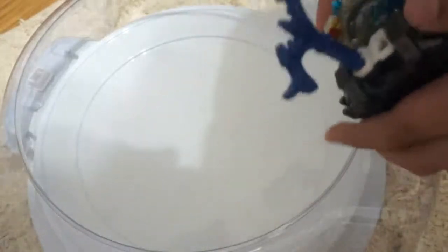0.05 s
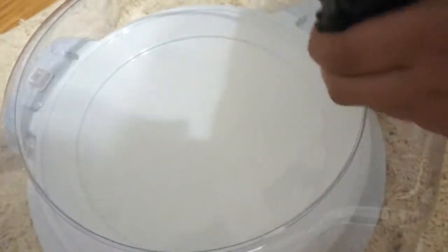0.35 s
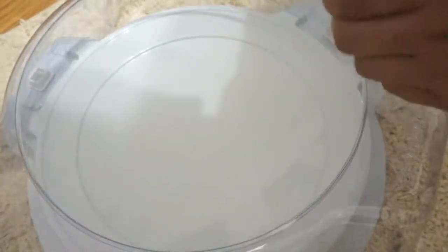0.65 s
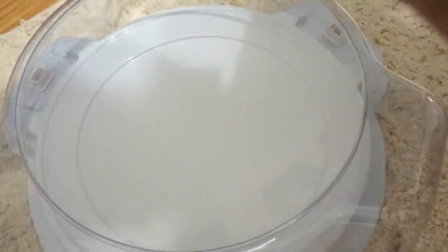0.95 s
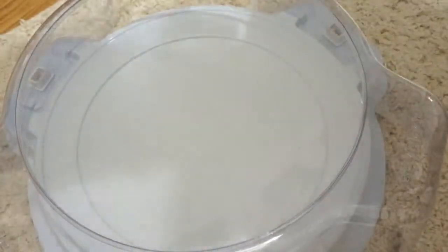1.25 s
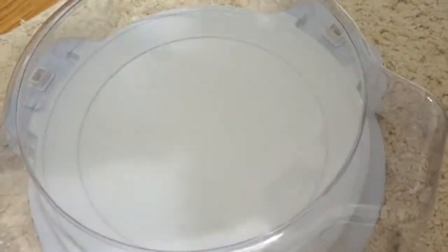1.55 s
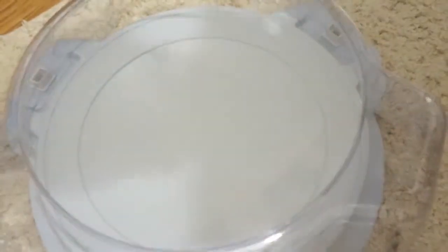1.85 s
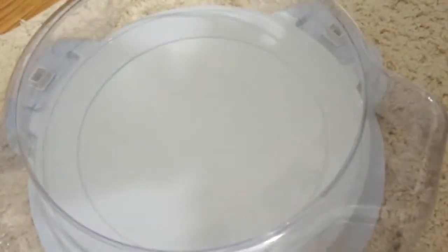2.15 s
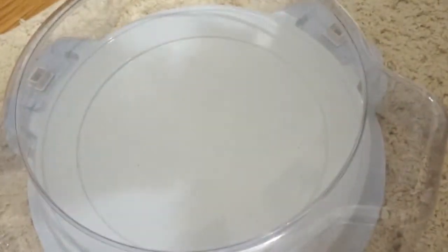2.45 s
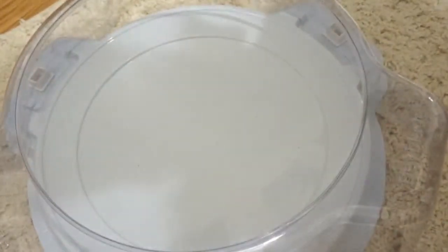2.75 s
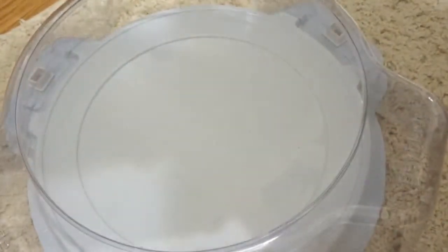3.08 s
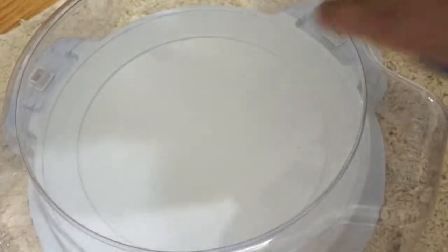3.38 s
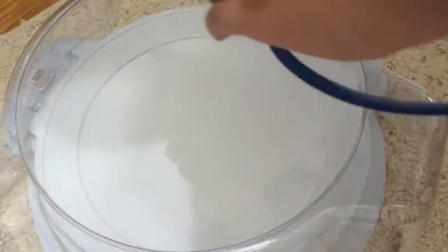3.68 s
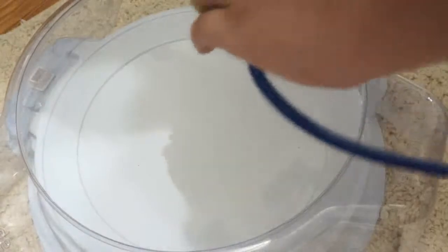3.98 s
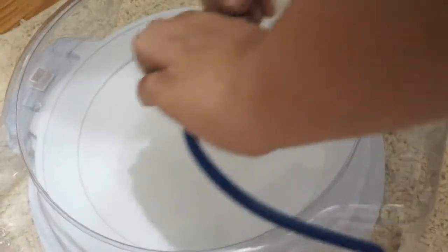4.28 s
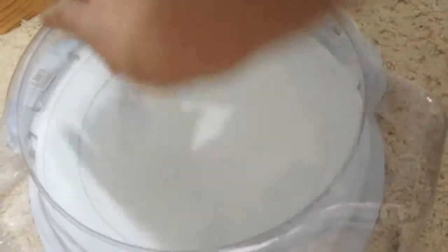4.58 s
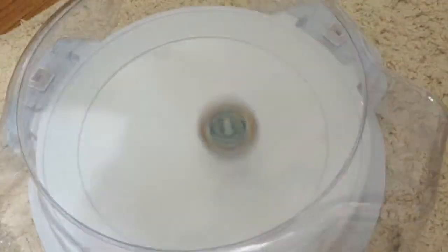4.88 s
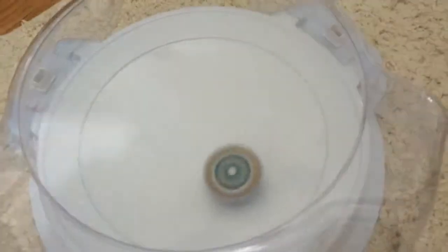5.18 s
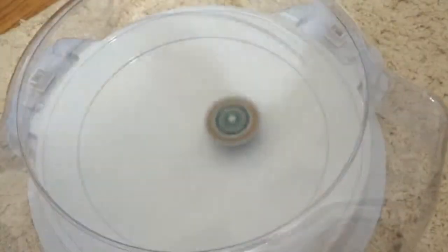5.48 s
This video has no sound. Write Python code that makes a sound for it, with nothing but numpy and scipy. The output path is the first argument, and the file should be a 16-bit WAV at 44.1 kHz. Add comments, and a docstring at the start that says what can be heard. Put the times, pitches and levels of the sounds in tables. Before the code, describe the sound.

Close up, slightly to the right, small plastic parts click and scrape as a toy top is fitted to its launcher. A light knock on a plastic dish comes at about 1 second, then more rubbing and little catches. At 2.5 seconds the top snaps home with a hollow rattle. Near 2.8 seconds a toothed cord clicks and zips in, followed by a soft swish and another dish knock at 4.2. At 4.6 seconds, straight ahead, the cord is ripped out with a loud, very short rising rasp, ending in sharp clicks and whirring gears. The top lands at 4.8 seconds, squeals briefly and bounces repeatedly, clacking and rumbling in the ringing dish. From about 5.4 seconds it spins with a quieter, steady scratching until the end, near 5.7. The small, hard room adds a slight echo and faint hiss.

```python
"""Launching a toy spinning top

A top clicks onto its hand launcher over a plastic dish, and a toothed cord zips in.
The cord is ripped out with a rising rasp, and the launcher's gears run on.
The top drops, bounces in the ringing dish, skids and spins on its scraping tip.
A small, hard room echoes a little; the microphone is close."""
import sys
import numpy as np
from scipy import signal
from scipy.fft import rfft, irfft, next_fast_len
from scipy.io import wavfile
from scipy.ndimage import uniform_filter1d, minimum_filter1d, map_coordinates

SR = 44100
rng = np.random.default_rng(int(sys.argv[2]) if len(sys.argv) > 2 else 0)


def dump_mix(stems):
    """Bounce the given channels to the path in sys.argv[1] as a 16-bit WAV at rate SR."""
    frames = np.atleast_2d(stems).T  # one column per channel
    limited = np.clip(frames, -1, 1)  # hard clip at full scale
    pcm = np.round(limited * 32767).astype(np.int16)
    wavfile.write(sys.argv[1], SR, pcm)


N = 252648
TIME = np.arange(N) / SR


def amp(db):
    """Turn decibels into a number to multiply by."""
    return 10 ** (np.asarray(db) / 20)


def unit(x):
    """Scale x to an average (rms) level of 1."""
    return x / np.sqrt(np.mean(x ** 2) + 1e-20)


def burst(x, span):
    """Give x the energy of a level-1 sound lasting span seconds."""
    return x / np.sqrt(np.sum(x ** 2) / (span * SR) + 1e-20)


def along(points, hz):
    """Read between the rows of a frequency table, on a log scale."""
    f, values = np.transpose(points)
    return np.interp(np.log(hz + 1), np.log(f + 1), values)


def curve(points):
    """Join (time, value) points with straight lines."""
    return np.interp(TIME, *np.transpose(points))


def wobble(rate):
    """A smooth random curve through rate points a second."""
    return map_coordinates(rng.standard_normal(int(N * rate / SR) + 4), [TIME * rate])


def swell(s, rise, fall, hold=0.):
    """Grow to 1 at time s, hold, then fade; rise and fall are the seconds for the top 10 dB."""
    away = np.maximum((s - TIME) / rise, 0) + np.maximum((TIME - s - hold) / fall, 0)
    return amp(-10 * away ** 1.1)


def filtered(x, gain_db):
    """Filter x by gain_db(hz), so that any ringing comes after its cause."""
    size = 2 * next_fast_len(len(x) // 2 + 4096)
    gain = amp(np.maximum(gain_db(np.fft.rfftfreq(size, 1 / SR)), -110))
    cepstrum = irfft(np.log(gain))
    cepstrum[1:size // 2] *= 2
    cepstrum[size // 2 + 1:] = 0
    return irfft(rfft(x, size) * np.exp(rfft(cepstrum)))[:len(x)]


def shaped(x, tone):
    """Give x the lows and highs of a tone table, at level 1."""
    return unit(filtered(x, lambda hz: along(tone, hz)))


def resonate(x, centre, width):
    """Let x ring around one frequency."""
    return filtered(x, lambda hz: -20 * np.log10(1 + ((hz - centre) / width) ** 2))


def add(track, s, sound):
    """Mix a sound into a track from time s."""
    part = track[max(round(s * SR), 0):][:len(sound)]
    part += sound[:len(part)]


# Tone of the background hiss: f/Hz, level/dB
HISS_TONE = [(18, -54), (30, -22), (152, -6), (271, -3), (931, 2.5), (1180, -4), (1380, 0.5), (1530, 0.5),
             (1750, -7), (3830, -5), (5990, -6), (7010, -6), (10400, -4), (15800, -7.5)]
# How loud the hiss is: t/s, level/dB
HISS_LEVEL = [(0, -67), (0.7, -67.5), (1.1, -63), (5.73, -60)]
# How loud the hum is: t/s, level/dB
HUM_LEVEL = [(0, -102), (0.7, -92), (1.3, -84.5), (2.3, -89), (3.0, -97), (3.8, -82)]
def background():
    """The room hisses softly over a faint, low hum."""
    mid, side = (shaped(rng.standard_normal(N), HISS_TONE) for ear in range(2))
    hiss = np.array([mid + 0.12 * side, mid - 0.22 * side])
    hum = unit(resonate(rng.standard_normal(N), centre=150, width=18))
    return amp(curve(HISS_LEVEL)) * hiss + amp(curve(HUM_LEVEL)) * hum


def grainy(tone, grain_db):
    """Noise whose level flickers in tiny grains."""
    slips = rng.standard_normal(N) * amp(grain_db * wobble(700) + wobble(50))
    return shaped(slips, tone)


# Finger strokes: peak t/s, level/dB, rise/s, fall/s, ring f/Hz, ring above scrape/dB
STROKES = [(0.04, -42.5, 0.13, 0.028, 3950, -10.5), (0.54, -51.5, 0.036, 0.05, 3100, -2),
           (0.835, -53.5, 0.084, 0.14, 2600, -5.5), (1.4, -56, 0.1504, .14, 3300, 3),
           (1.631, -47.5, 0.018, 0.031, 3420, -8), (1.8, -63, 0.13, 0.19, 3350, -2),
           (2.13, -52.5, 0.025, 0.032, 3150, -6), (2.29, -46.5, 0.063, .05, 3280, -13),
           (2.42, -53, 0.054, 0.0248, 3200, -8), (3.09, -55.5, 0.21, 0.076, 2600, -10),
           (4.28, -58.5, 0.088, 0.035, 2380, 0), (4.53, -54, 0.06, .07, 2870, -18)]
# Tone of parts rubbing: f/Hz, level/dB
RUB_TONE = [(400, -40), (750, -24.5), (1400, -14), (2200, -12.5), (2750, -3.5), (3200, -3), (3700, -12),
            (4400, -9), (5900, -11.5), (7800, -18), (14000, -27.5)]
def rubbing(ring_width_hz=380, wander=.045):
    """Fingers slide the parts over each other; each stroke scrapes and makes a part ring."""
    levels = np.array([amp(db) * swell(s, rise, fall) for s, db, rise, fall, _, _ in STROKES])
    ring_hz, ring_db = np.transpose(STROKES)[4:]
    # the pitch shifts with the grip, and every slip knocks the ring out of step
    pitch = ring_hz[levels.argmax(axis=0)] * (1 + wander * wobble(18)) + ring_width_hz * wobble(1800)
    flicker = amp(3.5 * wobble(350) + 1.9 * wobble(40))
    ring = unit(np.sin(2 * np.pi * np.cumsum(pitch) / SR) * flicker)
    return levels.sum(axis=0) * grainy(RUB_TONE, grain_db=3) + amp(ring_db) @ levels * ring


# Small parts give off little bass: f/Hz, level/dB
SMALL_PART_TONE = [(100, -26), (450, -15), (1000, 0)]
def contacts(rows, life, rise=0.00014):
    """Hard parts chatter and ring briefly. Returns the direct sound and the sound sent into the room."""
    ahead, around, t = np.zeros(N), np.zeros(N), np.arange(SR // 40) / SR
    for s, db, ring_hz, ring_db, low_db, treble_db in rows:
        chatter = rng.standard_normal(len(t)) * (1 - np.exp(-t / rise)) * np.exp(-t / life)
        body = [(450, low_db - 13), (750, low_db - 9), (1150, low_db - 3.5), (1550, low_db), (2100, -3),
                (3300, 0.5), (8000, treble_db), (12000, treble_db - 6.5), (16000, treble_db - 15)]
        tone = lambda hz: along(body, hz) + along(SMALL_PART_TONE, hz)
        ring = lambda hz: ring_db / (1 + ((hz - ring_hz) / (0.11 * ring_hz)) ** 2)
        click = filtered(chatter, lambda hz: tone(hz) + ring(hz))
        add(ahead, s, amp(db) * burst(click, 0.0019))
        # summed over all directions, the chatter sounds like one clean tick
        tick = filtered(1. * (t == 0), lambda hz: tone(hz) + 0.71 * ring(hz))
        add(around, s, amp(db) * burst(tick, 0.0015))
    return np.array([ahead, around])


# Parts meeting: t/s, level/dB, ring f/Hz, ring boost/dB, lows/dB, treble/dB
CLICKS = [(0.0179, -28, 3970, 17, -17, 5), (0.0217, -26, 2600, 11.5, 1.5, 2),
          (0.0441, -25.5, 7300, 13, 1, 8), (0.0567, -23.5, 3880, 15.5, 0.5, 2.5),
          (0.0615, -27.5, 2630, 8, -13, -1), (0.0668, -35, 7860, 9, -5, 0),
          (0.0719, -31.5, 4010, 12, -16, 1), (0.218, -30.5, 3200, 11.5, 0, -4.5),
          (0.258, -24.5, 6360, 8, -7, 0), (0.3135, -25.5, 2860, 7, -5, -8),
          (0.3179, -28.5, 2900, 13, 0, -5), (0.322, -22.5, 5700, 7.5, -10, 15),
          (0.3257, -18.5, 5720, 14.5, -7, 2), (0.5615, -30, 4700, 8.5, -6, -1.5),
          (2.1331, -36, 3120, 20, 8, 2.5), (2.3963, -27, 3224, 3, -8, -10.5), (2.4422, -35, 3000, 6, 4, -5),
          (2.4754, -15.5, 4080, 6, -2.5, -9.5), (2.4858, -23.5, 1560, 13, -5, -3),
          (2.4967, -28, 3640, 12, 1, -9), (2.6344, -30, 4580, 9.5, -14, -5),
          (2.8292, -19.5, 12750, 17, 1.5, 3.5), (2.894, -20.5, 1780, 9.5, -7, -3.5),
          (3.1529, -39.5, 4670, 8, -5, -4), (4.5387, -33.5, 2820, 8, 1.5, -2),
          (4.566, -23.5, 2510, 17, -6, -7), (4.5994, -17, 1770, 0, -3.5, -19)]
def clicks():
    """Hard parts of the top and launcher snap together."""
    return contacts(CLICKS, life=0.0031)


# Notes the dish rings at: f/Hz, level/dB, time to fade by 60 dB/s
DISH_NOTES = [(117, -23, .2), (198, -10, 0.17), (227.4, -2.5, 0.18), (259, -3.5, 0.2), (290, -5.5, 0.25),
              (368.3, -4, 0.3), (422, -10.5, 0.62), (459, 4.5, 0.26), (525.5, 4, 0.19), (630, -8, 0.31),
              (814, -5, 0.18), (945, -13, .2), (1182, -3, 0.083), (1293, -4, 0.17)]
# Tone of its dull thud: f/Hz, level/dB
THUD_TONE = [(35, -48), (60, -44), (100, -13.5), (219, -5.5), (264, -3), (310, -10), (355, -1), (446, -2.5),
             (584, -1), (634, -3.5), (1020, -21), (1160, -10), (1500, -24), (1950, -23), (3300, -120)]
# Deep bass is cut from the knocks: f/Hz, level/dB
DISH_BASS_CUT = [(30, -40), (75, -14), (150, -1)]
def dish_knocks(rows, clack_tone, notes_db, push_db, clack_fade_s, crack_db):
    """A blow dents the thin dish, then rings its low notes and a clacking crowd of higher ones."""
    out, t = np.zeros(N), np.arange(SR // 2) / SR
    dent = t / 0.0017
    push = np.sin(2 * np.pi * 350 * t) * dent * np.exp(1 - dent)
    clack_shape = amp(-60 * t / clack_fade_s) + amp(crack_db) * np.exp(-t / 0.0021)
    for s, db, clack_db, *_ in rows:
        notes = sum(amp(level + rng.normal(0, 2.3) - 60 * t / fade)
                    * np.sin(2 * np.pi * (hz * t + rng.random())) for hz, level, fade in DISH_NOTES)
        ring = burst(notes * (1 - np.exp(-dent)), 0.0082)
        thud = burst(shaped(rng.standard_normal(len(t)) * amp(-60 * t / 0.11), THUD_TONE), 0.015)
        clack = burst(shaped(rng.standard_normal(len(t)) * clack_shape, clack_tone), 0.008)
        low = amp(notes_db) * ring + amp(-12) * thud + amp(push_db) * push
        add(out, s, amp(db) * (low + amp(clack_db - 11.5) * clack))
    return filtered(out, lambda hz: along(DISH_BASS_CUT, hz))


# Bumps on the dish: t/s, level/dB, clack boost/dB
BUMPS = [(0.9694, -37, 15), (4.1646, -32, 9.5), (4.3304, -46, 15)]
# Tone of their clack: f/Hz, level/dB
BUMP_TONE = [(71, -51), (120, -25.5), (275, -4), (642, -1.5), (818, -0.5), (1000, -9), (1300, -7.5),
             (1700, -7.5), (3040, -10), (4500, -21), (6500, -27), (15000, -40)]
def bumps():
    """A hand knocks the dish from outside."""
    return dish_knocks(BUMPS, BUMP_TONE, notes_db=-13.5, push_db=-11, clack_fade_s=.18, crack_db=13)


# Snags of a sliding part: t/s, level/dB, ring f/Hz, treble/dB
SNAGS = [(1.2065, -37.5, 3040, -10), (1.3485, -25, 3170, -15), (1.3945, -48, 3180, -11),
         (1.407, -40, 3450, -14), (1.476, -34, 3200, -11), (1.5029, -36.5, 3250, -6),
         (1.629, -27.5, 3450, -1.5), (1.7356, -43, 3140, -22), (1.816, -46.5, 3500, -18),
         (1.886, -42.5, 3320, -1), (1.896, -44.5, 3100, -4), (1.9202, -42, 2320, -9),
         (2.1421, -31.5, 2720, -27), (2.2019, -43, 3120, -17), (3.12, -41.5, 4720, -7),
         (3.2381, -38.5, 2720, -7), (3.6732, -45, 4440, -6), (3.87, -49, 3900, -12),
         (4.4555, -47, 2300, -16)]
def snags(low_db=-5):
    """A part catches and lets go; the harder the catch, the more a plastic prong rings."""
    rows = [(s, db, hz, 13.5 + 0.81 * (db + 38.5), low_db, treble_db) for s, db, hz, treble_db in SNAGS]
    return contacts(rows, life=0.0016)


# Tone of the launcher's hollow body: f/Hz, level/dB
HOUSING_TONE = [(300, -50), (700, -28), (1000, -13), (1200, -1.5), (1580, 0), (2000, -15), (3150, -5),
                (4600, -10), (8700, -15.5), (14000, -33)]
def latch(s=2.477, db=-28.5, fade_s=0.36):
    """The top snaps home and the launcher's hollow body rattles."""
    out, t = np.zeros(N), np.arange(SR // 2) / SR
    rattle = rng.standard_normal(len(t)) * amp(-60 * t / fade_s + 3.6 * wobble(411)[:len(t)])
    add(out, s, amp(db) * burst(shaped(rattle, HOUSING_TONE), 0.018))
    return out


def ratchet(rate, jitter, snap):
    """One snap per tooth; snap is its fade time as a share of the gap between teeth."""
    teeth = np.cumsum(rate * (1 + jitter * wobble(900))) / SR
    return np.exp(-(teeth % 1) / snap)


def coast(tone, start, db, rise, hold, fall, teeth_hz, slowing_s):
    """Gears run free while a small lever skips over their teeth ever more slowly."""
    age = TIME - start
    rate = teeth_hz * np.exp(-np.clip(age / slowing_s, 0, 2))
    skips = .2 + ratchet(rate, jitter=.15, snap=0.15)
    level = (age > 0) * swell(start + rise, rise, fall, hold) * amp(db + 1.9 * wobble(140))
    return level * shaped(skips * rng.standard_normal(N), tone)


# Tone of the cord zipping in: f/Hz, level/dB
FEED_TONE = [(240, -69), (400, -37), (425, -39), (504, -24), (615, -29), (799, -13), (890, -23), (1290, -7),
             (1370, -3), (1750, 0.5), (3450, -2.5), (3720, -4.5), (5640, -6), (12500, -3.5), (15800, -9)]
def cord_feed():
    """Feeding in the cord turns the gears with a short zip."""
    return coast(FEED_TONE, 2.829, db=-37, rise=.012, hold=.1, fall=0.051, teeth_hz=622, slowing_s=.19)


# Tone of the swish: f/Hz, level/dB
SWISH_TONE = [(180, -50), (300, -33), (339, -15), (592, -17.5), (690, -11.5), (1020, -15), (1260, -6),
              (1450, -10), (2900, 1), (3490, -11), (5460, -7.5), (5900, -13.5), (8030, -18), (9370, -36),
              (12000, -29), (15600, -56), (22000, -120)]
def swish():
    """One long, soft rub as the launcher is swung over the dish."""
    return amp(-50) * swell(3.406, rise=0.16, fall=0.066, hold=.25) * grainy(SWISH_TONE, grain_db=0.5)


# Speed of the cord: t/s, teeth passing/Hz
PULL_SPEED = [(4.54, 148), (4.6, 466), (4.62, 630), (4.635, 820), (4.65, 1020), (4.665, 1190), (4.68, 1260)]
# Tone of its rasp: f/Hz, level/dB
RASP_TONE = [(180, -47), (300, -23), (723, -24.5), (1270, -9), (1470, -14), (2050, 1), (2550, -8),
             (3010, 3), (4120, -4.5), (4550, -1), (5470, -5.5), (8840, -5.5), (15800, -16.5)]
# Tone of its whine: f/Hz, level/dB
WHINE_TONE = [(300, -48), (600, -20.5), (900, -17), (1250, -3), (2000, 4), (3000, 5), (5000, 6.5),
              (9000, 4.5), (15800, -19.5)]
def cord_rip(loudest_hz=600, cord_out_s=4.676, whine_db=-5.5):
    """The cord's teeth hit a small gear ever faster: a rising whine inside a rasp."""
    rate = curve(PULL_SPEED)
    octaves = np.log2(rate / loudest_hz)
    # faster teeth hit harder, until the top gets going and the force eases
    force_db = -19 + np.minimum(17.5 * octaves, -1.5 * octaves)
    fade_db = -1600 * np.maximum(TIME - cord_out_s, 0)
    teeth = ratchet(rate, jitter=.06, snap=.3)
    judder = amp(1.5 * wobble(330))  # the cord slaps unevenly in its guide
    rasp = shaped(teeth * rng.standard_normal(N) * judder, RASP_TONE)
    buzz = (teeth - teeth.mean()) * amp(2.8 * wobble(150))
    whine = shaped(shaped(buzz, WHINE_TONE), SMALL_PART_TONE)
    return (TIME > PULL_SPEED[0][0]) * amp(force_db + fade_db) * (rasp + amp(whine_db) * whine)


# Tone of the whirring gears: f/Hz, level/dB
GEAR_TONE = [(240, -67), (400, -42), (1020, -26), (1310, -9), (1430, -10), (1620, -9), (2240, -5),
             (3450, 0.5), (5220, -6.5), (9660, -1), (10800, -4), (12700, -5.5), (15800, -15)]
def gear_whirr():
    """After the pull, the gears race on by themselves."""
    return coast(GEAR_TONE, 4.68, db=-27.5, rise=.058, hold=.012, fall=.069, teeth_hz=1795, slowing_s=.2)


def release(s=4.681, gap_s=.007, ring_hz=5600, ring_db=7, low_db=-19, treble_db=4):
    """As the cord leaves, the release catch hits its stop four times, each time more weakly."""
    rows = [(s + k * gap_s, -14.5 - 2 * k, ring_hz, ring_db, low_db, treble_db) for k in range(4)]
    return contacts(rows, life=0.0024)


# The top's bounces: t/s, level/dB, clack boost/dB, rim level/dB, rim treble/dB, rim delay/s
BOUNCES = [(4.7941, -20, 7.5, -15.5, 5, 0.00056), (4.9910, -13, 2.5, -12.5, 5.5, 0.0023),
           (5.1090, -13.5, 3, -13, 4, .003), (5.1785, -16, 2.5, -21, -12.5, .0008),
           (5.2192, -20, 4, -25, -9, .0015), (5.2633, -26, 5.5, -22.5, 1.5, 0.00056),
           (5.305, -24, -6, -24.5, 0, 0.00077), (5.3430, -17, 2.5, -21.5, 0, .0007),
           (5.3495, -28, -2, -19, 7.5, .001), (5.401, -26.5, -7, -28.5, -18.5, .0006),
           (5.4264, -28, -7, -28, -18, 0.00095)]
# Tone of their clack: f/Hz, level/dB
BOUNCE_TONE = [(50, -51), (150, -21), (400, -8), (750, 0), (1600, -4.5), (2800, -5.5), (4500, -20),
               (9000, -27), (16000, -57)]
def bounces():
    """The top drops and strikes the dish again and again."""
    return dish_knocks(BOUNCES, BOUNCE_TONE, notes_db=-10, push_db=-4, clack_fade_s=0.19, crack_db=9.5)


def rim_clicks(ring_hz=2600, ring_db=4, low_db=2):
    """At each bounce, the top's metal rim clicks just after the tip lands."""
    rows = [(s + delay, db, ring_hz, ring_db, low_db, treble) for s, _, _, db, treble, delay in BOUNCES]
    return contacts(rows, life=0.0034, rise=0.001)


# Skids of the tilted top: t/s, rise/s, hold/s, fall/s, rumble/dB, scratch/dB
SKIDS = [(4.82, 0.013, 0.0058, 0.092, -30.5, -35), (5.114, 0.094, .36, .04, -38.5, -38)]
# Tone of the scratching tip: f/Hz, level/dB
SCRATCH_TONE = [(180, -50), (300, -34), (452, -9), (515, -18), (1170, -5.5), (2100, -5), (2480, 5),
                (3920, -13), (4770, -2), (5530, -17), (7420, -11), (15000, -37)]
# Notes the top rings at: f/Hz, base width/Hz, level/dB
TOP_NOTES = [(2454, 130, -1), (3205, 270, 0), (4720, 170, -8.5), (7150, 250, -26)]
# Tone of the rumbling dish: f/Hz, level/dB
RUMBLE_TONE = [(35, -55), (60, -24), (97, -18.5), (218, -4), (324, -7), (416, -2.5), (489, -4.5), (534, -2),
               (583, -7.5), (854, -6.5), (989, -13.5), (1060, -8.5), (1410, -15), (2000, -19), (2600, -31),
               (4400, -120)]
def spin(turn_hz=80, upright_s=5.45):
    """The tip scrapes once a turn and makes the top ring; while it skids, the dish rumbles."""
    upright = swell(upright_s, rise=.1, fall=1, hold=1)
    scratch_level, rumble_level = amp(-44.5) * upright, amp(-74) * upright
    for s, rise, hold, fall, rumble_db, scratch_db in SKIDS:
        skid = swell(s, rise, fall, hold)
        scratch_level = np.maximum(scratch_level, amp(scratch_db) * skid)
        rumble_level = np.maximum(rumble_level, amp(rumble_db) * skid)
    turns = np.cumsum(turn_hz * (1 + 0.0284 * wobble(20))) / SR
    pressure = (1 + 0.24 * np.sin(2 * np.pi * turns)) * amp(1.5 * wobble(400))
    grit = lambda: pressure * rng.standard_normal(N)
    scratch = amp(-3) * shaped(grit(), SCRATCH_TONE)
    for hz, width, db in TOP_NOTES:
        ring = resonate(grit(), hz, 1.23 * width)
        scratch += amp(db - 4.5) * unit(ring * amp(3 * wobble(22)))
    rumble = shaped(grit() * amp(1.8 * wobble(70)), RUMBLE_TONE)
    return scratch_level * scratch + rumble_level * rumble


# Tone of the ringing: f/Hz, level/dB
RINGING_TONE = [(590, -26), (1000, 1), (1140, -17), (1600, -6), (2050, 0), (2650, -9), (3220, -19),
                (3500, -30), (4830, -17), (6000, -24), (7800, -53), (13200, -120)]
def ringing_tone():
    """A ringing tone sounds between the top's first two bounces."""
    return amp(-37) * swell(4.83, rise=0.017, fall=.01, hold=0.159) * grainy(RINGING_TONE, grain_db=2.5)


# How long the room echoes: f/Hz, time to fade by 60 dB/s
ECHO_FADE = [(150, 0.29), (500, 0.41), (1400, 0.51), (3700, 0.35), (8000, 0.32), (15000, .22)]
# How much the echo differs between the ears: f/Hz, level/dB
ECHO_WIDTH = [(200, -9), (700, 8.5), (4000, 8.5), (8000, 0.5), (14000, -69)]
def in_room(x, left_db, echo_db, spread=0.15):
    """Direct sound, then the room's smooth echo; if x has a second row, that row feeds the echo."""
    rows = np.atleast_2d(x)
    hz, t, noise = signal.stft(rng.standard_normal((2, SR // 2)), SR, nperseg=256)
    fade = amp(-60 * t / along(ECHO_FADE, hz)[:, None]) * (1 - np.exp(-t / 0.00068))
    mid, side = signal.istft(noise * fade, SR, nperseg=256)[1]
    side = filtered(side, lambda hz: along(ECHO_WIDTH, hz))
    tail = np.array([mid + spread * side, mid - spread * side]) / np.linalg.norm(mid)
    echo = signal.fftconvolve(rows[-1:], tail, axes=1)[:, :N]
    return rows[0] * amp([[left_db / 2], [-left_db / 2]]) + amp(echo_db) * echo


def scene():
    """The top is clicked on off to the right; the launch is straight ahead."""
    snaps = clicks() + snags()
    loading = TIME < 2.7
    return (background()
            + in_room(rubbing() + swish(), left_db=-4, echo_db=-9)
            + in_room(snaps * loading + latch(), left_db=-4, echo_db=-8)
            + in_room(bumps(), left_db=-3, echo_db=-5, spread=0.16)
            + in_room(snaps * ~loading + release(), left_db=1, echo_db=-4.5)
            + in_room(cord_feed() + gear_whirr(), left_db=0, echo_db=-0.5)
            + in_room(cord_rip(), left_db=0.2, echo_db=-21.5)
            + in_room(bounces(), left_db=-1.1, echo_db=-5.5, spread=0.14)
            + in_room(rim_clicks(), left_db=0.3, echo_db=-5)
            + in_room(spin() + ringing_tone(), left_db=-.5, echo_db=-7.5))


def record(dry, ceiling=0.88, highest_hz=15900):
    """A fast limiter turns down the loudest peaks, and the very highest treble is cut off."""
    needed_gain = np.minimum(1, ceiling / (np.abs(dry).max(axis=0) + 1e-9))
    limited = dry * uniform_filter1d(minimum_filter1d(needed_gain, size=256), size=128)
    size = next_fast_len(N + SR // 2)
    kept = np.fft.rfftfreq(size, 1 / SR) < highest_hz
    return irfft(rfft(limited, size) * kept, size)[:, :N]


dry = scene()
out = record(dry)
dump_mix(out)
```